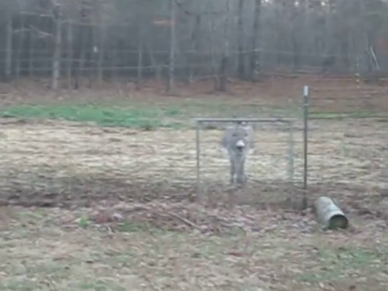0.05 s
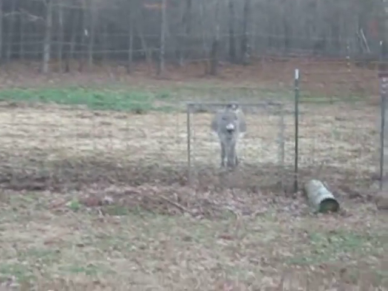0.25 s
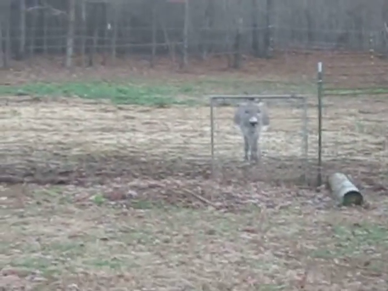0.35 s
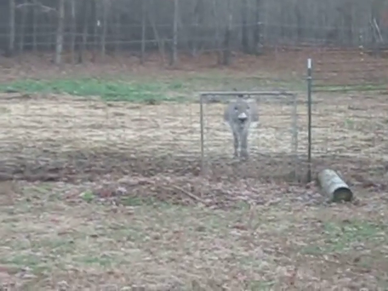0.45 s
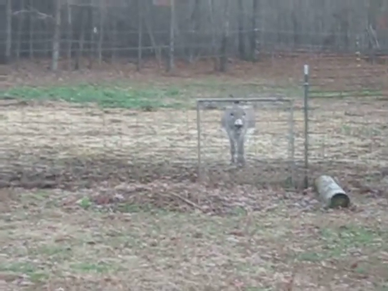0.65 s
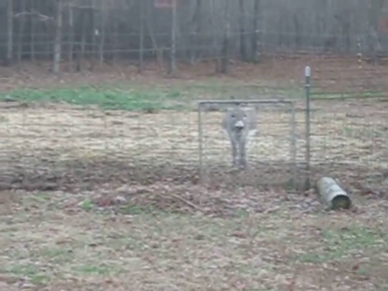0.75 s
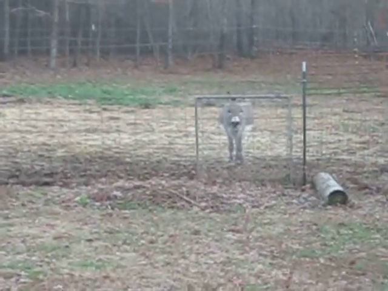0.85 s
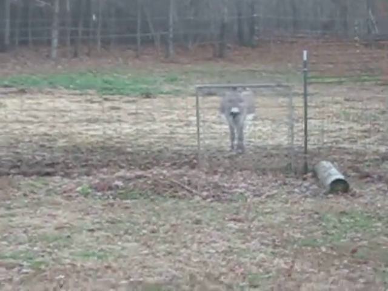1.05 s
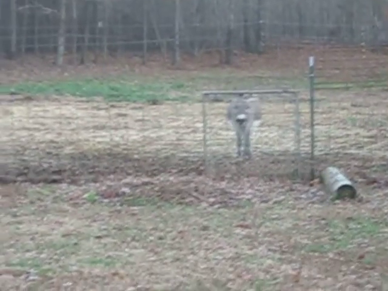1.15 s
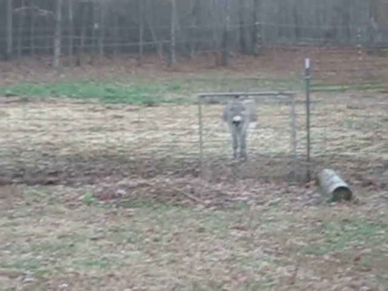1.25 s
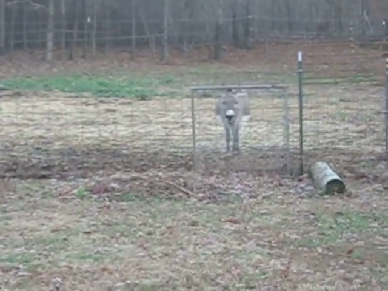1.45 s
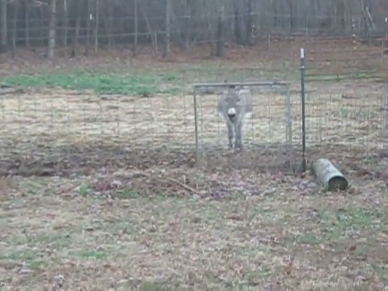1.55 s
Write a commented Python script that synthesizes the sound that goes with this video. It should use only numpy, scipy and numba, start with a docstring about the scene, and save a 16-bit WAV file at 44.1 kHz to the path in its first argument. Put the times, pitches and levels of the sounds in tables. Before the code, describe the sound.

A donkey huffs across a field in steady outdoor air, with faint rubs, bumps and clicks on the microphone. At 0.2 seconds a short falling grunt tightens into a loud, high, whistling bray, ending in a thin wheeze by 0.45. More huffs follow from 0.5 to 0.8. A croak at 0.9 leads into a longer, raspy squeal until 1.35. Both brays echo lightly, and faint handling returns at 1.5.

```python
"""A donkey across an open field, heard in steady outdoor air from the microphone of a handheld camera.
It huffs, while fingers rub, bump and crackle on the camera. Its vocal folds pulse in a short falling
grunt, then tighten into a high, clear whistle with a rasp of air, closing on a thin wheeze. More huffs
and a croak lead to a second, longer squeal, torn and raspy. The edge of the woods echoes both brays,
and at the end the hand shifts faintly once more."""
import sys
import numpy as np
from scipy import signal
from scipy.fft import rfft, irfft
from scipy.io import wavfile
from scipy.ndimage import uniform_filter1d
from numba import njit

SR = 44100
rng = np.random.default_rng(int(sys.argv[2]) if len(sys.argv) > 2 else 0)


def persist_wave(psi):
    """Save psi, clipped to +-1, as 16-bit WAV."""
    counts = np.round(np.clip(psi, -1, 1) * 32767).astype(np.int16)
    wavfile.write(sys.argv[1], SR, np.atleast_2d(counts).T)


N = 70560
T = np.arange(N) / SR

# whistle of the taut vocal folds, one table per bray: (t/s, f/Hz, level/dB, roughness from 0 = clear)
WHISTLES = [
    [(.281, 5240, -38.5, 0), (.293, 5040, -22, 0), (.305, 4775, -14, 0), (.334, 4732, -17, 0),
     (.341, 4590, -17.5, 0.17), (.356, 4596, -14, 0.1), (.362, 5046, -25, 1.2), (.369, 4559, -17, 0.27),
     (.40, 4556, -17, 0.06), (.422, 4585, -21, 0), (.434, 4830, -27, 0.2)],
    [(.951, 5100, -48, 0.19), (.962, 4920, -22, 0.01), (.975, 4480, -19, 0), (.988, 4430, -15, 0.32),
     (1.003, 4479, -18.5, 0.55), (1.04, 4347, -23, 0.58), (1.068, 4330, -15, 0.24),
     (1.105, 4339, -27, 0.63), (1.2, 4310, -23.5, 0.52), (1.25, 4270, -27.5, 0.78),
     (1.285, 4188, -22.5, 0.57), (1.32, 4240, -23, 0.43), (1.342, 4470, -32.5, 0.2),
     (1.351, 4600, -47, 0.1)],
]


def undb(db):
    """Decibels to gain."""
    return 10 ** (np.asarray(db) / 20)


def unit(x):
    """Scale to rms 1."""
    return x / (x.std() + 1e-12)


def curve(rows, axis=1):
    """One column of a table, joined by straight lines in time."""
    rows = np.array(rows, float)
    return np.interp(T, rows[:, 0], rows[:, axis])


def envelope(rows, axis=1, edge_s=.002):
    """Gain from a dB column, fading to silence outside the table."""
    inside = np.minimum(T - rows[0][0], rows[-1][0] - T) / edge_s + 1
    return undb(curve(rows, axis)) * np.clip(inside, 0, 1)


def walk(rate):
    """Smooth random drift with about `rate` turns a second, spread 1."""
    f = np.fft.rfftfreq(N, 1 / SR)
    return unit(irfft(rfft(rng.standard_normal(N)) / np.sqrt(1 + (2 * f / rate) ** 4), N))


def colour(x, points):
    """Shape a spectrum by (f/Hz, gain/dB) points."""
    hz, db = np.array(points, float).T
    f = np.fft.rfftfreq(N, 1 / SR)
    return irfft(rfft(x) * undb(np.interp(np.log(f + 1), np.log(hz), db)), N)


@njit
def bandpass(x, hz, width):
    """State-variable band-pass with a moving centre, peak gain 1."""
    y, band, low = np.empty(len(x)), 0., 0.
    for i in range(len(x)):
        g, damping = np.tan(np.pi * hz[i] / SR), width / hz[i]
        v = (band + g * (x[i] - low)) / (1 + g * (g + damping))
        band, low = 2 * v - band, low + 2 * g * v
        y[i] = damping * v
    return y


def resonate(x, resonances, scale=1):
    """Steep parallel resonances (centre, width/Hz, gain/dB), each at centre * scale in Hz."""
    out = 0
    for hz, width, db in resonances:
        centre = hz * scale * np.ones(N)
        once = bandpass(x, centre, float(width))
        out = out + undb(db) * bandpass(once, centre, float(width))
    return out


def outdoor_air():
    """The steady background of the field, strongest in the lows."""
    # spectrum of the open air: (f/Hz, relative level/dB)
    spectrum = [(70, -0.5), (160, -1.5), (250, -3.5), (500, -7.5), (850, -1), (1050, -4.5), (1300, -3),
                (1900, -10.5), (2600, -9), (3700, -16.5), (5200, -21), (9000, -26.5), (15500, -33)]
    # its loudness at the microphone: (t/s, level/dB)
    levels = [(0, -47.5), (.5, -50), (.92, -50.5), (1.05, -53), (1.4, -53.5), (1.6, -50.5)]
    return unit(colour(rng.standard_normal(N), spectrum)) * undb(curve(levels) + .23 * walk(16))


def huffs():
    """Unvoiced breath rushes through the donkey's open mouth."""
    # breath ahead of each bray, one table each: (t/s, level/dB, mouth resonance f/Hz)
    breaths = [
        [(0, -49, 1336), (.1, -52.5, 1284), (.195, -55, 1280)],
        [(.5, -59, 1456), (.63, -49, 1500), (.71, -55.5, 1380), (.79, -50, 1720), (.84, -77, 1600)],
    ]
    # resonances of the airway: (multiple of the mouth resonance, width/Hz, gain/dB)
    airway = [(.62, 260, -4), (1.002, 277, 8), (1.7, 830, -15)]
    out = 0
    for rows in breaths:
        breath = rng.standard_normal(N) * undb(walk(60))
        out += unit(resonate(breath, airway, curve(rows, axis=2))) * envelope(rows, edge_s=.026)
    return out


def handling():
    """Fingers rub the camera and its shell gives tiny dry clicks, right at the microphone."""
    # fingers rubbing: (t/s, level/dB)
    rub = [(0, -58.5), (.07, -71), (.11, -53), (.14, -51.5), (.19, -52.5), (.26, -69), (.31, -55.5),
           (.42, -66)]
    # crackles of the camera body: (t/s, level/dB)
    crackles = [(0.112, -38.5), (0.1171, -41), (0.1305, -37), (1.506, -51.5), (1.53, -52.5)]
    # response of the shell, colouring both: (f/Hz, gain/dB)
    shell = [(1000, -34), (3000, -9), (4200, 7), (5200, -9), (6300, 4), (8000, -1), (11000, 3), (15500, -2)]
    click_decay_s, grains_per_s = .00046, 1500
    clicks = sum(undb(db) * (T >= s) * np.exp(-abs(T - s) / click_decay_s) for s, db in crackles)
    grains = (rng.random(N) < grains_per_s / SR) * rng.standard_normal(N)
    friction = unit(grains + .037 * rng.standard_normal(N))
    return colour(2 * clicks * rng.standard_normal(N) + friction * envelope(rub), shell)


def grip_bumps():
    """Dull low thuds as the hand shifts its grip on the camera."""
    # soft bumps of the hand: (t/s, level/dB)
    bumps = [(.045, -48), (0.849, -54.5), (1.54, -56.5)]
    half_length_s, thud_hz, width_hz = .029, 81.4, 110
    swell = sum(undb(db) * np.exp(-((T - s) / half_length_s) ** 2) for s, db in bumps)
    return swell * unit(resonate(rng.standard_normal(N), [(thud_hz, width_hz, 0)]))


def grunts():
    """Slowing pulses of the vocal folds, each with a puff of air, ring a throat that slackens too."""
    # pulsing of the folds, one table per bray: (t/s, pulse rate f/Hz, level/dB)
    pulsings = [
        [(.1982, 468, -39), (.202, 451.5, -26), (.215, 383.4, -26.5), (.24, 318, -28), (.256, 294.4, -33),
         (.278, 257.7, -35), (.30, 234, -56)],
        [(.8975, 260, -39.5), (.909, 192.3, -44), (.915, 147, -38.5), (.921, 133.7, -48), (.95, 183, -48.5)],
    ]
    # throat resonances: (f/Hz, width/Hz, gain/dB)
    throat = [(400, 590, -17.5), (840, 208, -1.5), (1266, 224, 3), (1484, 82, 5), (2576, 330, -4),
              (3430, 250, -6.5), (4610, 1400, -6), (5980, 350, -18)]
    # band that each grunt fills, the second a thin croak: (lowest f/Hz, highest f/Hz)
    bands = [(100, 6800), (1050, 11000)]
    jitter, shimmer_db, rest_hz = .014, 1.6, 312
    out = 0
    for rows, band in zip(pulsings, bands):
        hz = curve(rows) * (1 + jitter * walk(360))
        cycles = np.cumsum(hz * (T > rows[0][0])) / SR
        pulses = np.diff(np.ceil(cycles), prepend=0) * np.sqrt(SR / hz) * undb(shimmer_db * walk(610))
        puffs = .44 * rng.standard_normal(N) * np.exp(-2 * (cycles % 1))
        throat_gain = resonate(rng.standard_normal(N), throat).std()
        tension = (np.maximum(curve(rows), 250) / rest_hz) ** .22
        voice = resonate((pulses + puffs) * envelope(rows, axis=2), throat, tension) / throat_gain
        out += signal.sosfilt(signal.butter(4, band, "bandpass", fs=SR, output="sos"), voice)
    return out


def squeals():
    """The taut folds whistle; when rough, a slower flapping adds sidebands and the level tears."""
    # mouth resonances that pass the overtones, one table per bray: (f/Hz, width/Hz, gain/dB)
    mouths = [
        [(9210, 350, -22.5), (10150, 1200, -22.5), (14000, 1800, -45.5)],
        [(8700, 520, -37), (9640, 580, -34)],
    ]
    waver_hz, jitter_hz, flap_hz = 19, 135, 215
    smear_rad, overtone_lift_db, flutter_db = .65, 14.5, 6.5
    out = 0
    for rows, mouth in zip(WHISTLES, mouths):
        rough = np.clip(curve(rows, axis=3), 0, 1)
        hz = curve(rows) + waver_hz * walk(180) + rough * jitter_hz * walk(360)
        phase = 2 * np.pi * np.cumsum(hz) / SR
        overtones = sum(np.sin(k * phase + (k - 1) * smear_rad * walk(1200)) for k in (2, 3))
        tone = np.sin(phase) + resonate(overtones, mouth) * undb(overtone_lift_db * rough)
        flap_rate = flap_hz * (1 + .3 * walk(180))
        growl = 1 + .55 * rough * np.sin(2 * np.pi * np.cumsum(flap_rate) / SR)
        tearing = 2 * np.tanh(walk(240) / 2 + .5) - 1  # deep dips, shallow peaks
        flutter = undb(rough * flutter_db * tearing)
        out += np.sqrt(2) * tone * growl * flutter * envelope(rows, axis=2)
    return out


def rasps():
    """Turbulence beside the whistle rings the moving mouth and a throat that follows the pitch."""
    # rush of air, one table per bray: (t/s, level/dB, mouth resonance f/Hz)
    rushes = [
        [(.287, -30, 2020), (.305, -27.5, 2070), (.335, -25, 2260), (.347, -28, 2030), (.39, -28, 2010),
         (.425, -34.5, 1880), (.47, -55, 1900)],
        [(.96, -42, 2320), (.98, -25.5, 2130), (1.0, -22, 1940), (1.055, -25.5, 1764), (1.11, -25.5, 1884),
         (1.25, -26, 1800), (1.3, -31, 1915), (1.33, -33, 2060), (1.39, -49, 1850)],
    ]
    # throat resonances, one table per bray: (f/Hz, width/Hz, gain/dB)
    throats = [
        [(1312, 190, -4.5), (2480, 460, 3), (3080, 620, -1.5), (4246, 540, 5), (5530, 800, -17.5),
         (9700, 2200, -27.5)],
        [(1293, 146, -6), (2146, 420, -4.5), (2540, 340, 0), (2936, 274, 4), (3300, 270, 1), (4170, 466, 6),
         (5270, 590, -9.5), (8600, 3200, -30), (9930, 1180, -23), (13000, 5200, -45)],
    ]
    flutter_db, swell_db, drift, mouth_width_hz = 1.5, 1.6, .008, 204
    out = 0
    for rows, throat, whistle in zip(rushes, throats, WHISTLES):
        flutter = undb(flutter_db * walk(730))
        pitch = uniform_filter1d(curve(whistle), SR // 20)
        tension = (pitch / np.median(np.array(whistle)[:, 1])) ** .5
        rasp = resonate(rng.standard_normal(N), [(.99, mouth_width_hz, 0)], curve(rows, axis=2))
        for resonance in throat:  # each swells and drifts on its own
            turbulence = rng.standard_normal(N) * undb(swell_db * walk(29))
            rasp += resonate(turbulence, [resonance], tension * (1 + drift * walk(23)))
        out += unit(rasp * flutter) * envelope(rows)
    return out


def wheezes():
    """The last air of each squeal squeezes through the closing folds."""
    # thin gasps: (t/s, level/dB, half length/s)
    gasps = [(0.441, -46.5, 0.024), (1.317, -44.5, 0.05)]
    # throat resonances: (f/Hz, width/Hz, gain/dB)
    throat = [(5320, 380, 3), (6980, 3200, -23), (10230, 790, -12.5)]
    swell = sum(undb(db) * np.exp(-((T - s) / half_length) ** 2) for s, db, half_length in gasps)
    return swell * unit(resonate(rng.standard_normal(N), throat))


def across_field(x):
    """The direct sound arrives with ground scatter, one near echo and a long wash from the woods."""
    ground_decay_s, ground_db = .025, -13.5
    echo_s, echo_db = .029, -11.5
    woods_t60_s, woods_onset_s, woods_db = .88, .022, -23
    ground = rng.standard_normal(N) * np.exp(-T / ground_decay_s)
    woods = rng.standard_normal(N) * np.exp(-np.log(1000) * T / woods_t60_s)
    woods *= 1 - np.exp(-T / woods_onset_s)
    response = undb(ground_db) * ground / np.linalg.norm(ground)
    response += undb(woods_db) * woods / np.linalg.norm(woods)
    response[int(echo_s * SR)] += undb(echo_db)
    dulled = signal.sosfilt(signal.butter(2, 6500, fs=SR, output="sos"), response)
    return x + signal.fftconvolve(x, dulled)[:N]


def scene():
    """Mono: the donkey out in the field, the hand close and dry, open air all round."""
    donkey = grunts() + squeals() + rasps() + huffs() + wheezes()
    return (across_field(donkey) + handling() + grip_bumps() + outdoor_air())[None]


def record(dry):
    """The camera cuts the treble steeply above 15.8 kHz."""
    return signal.sosfilt(signal.ellip(10, .2, 70, 15800, fs=SR, output="sos"), dry)


dry = scene()
out = record(dry)
persist_wave(out)
```